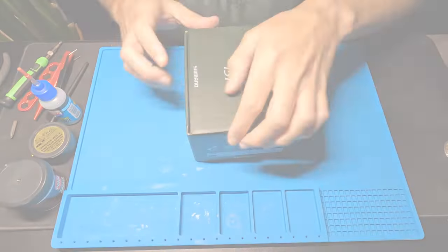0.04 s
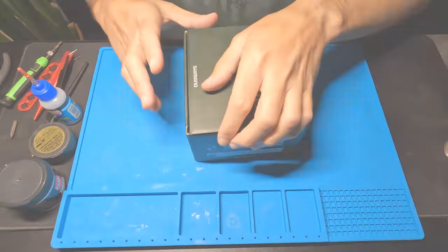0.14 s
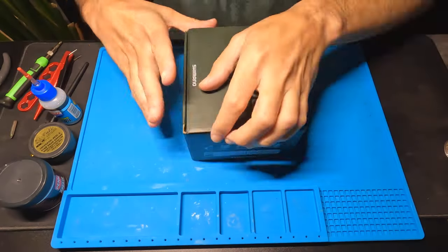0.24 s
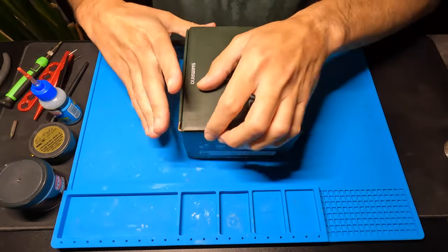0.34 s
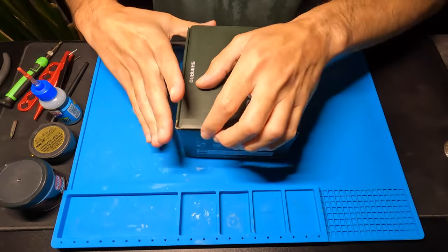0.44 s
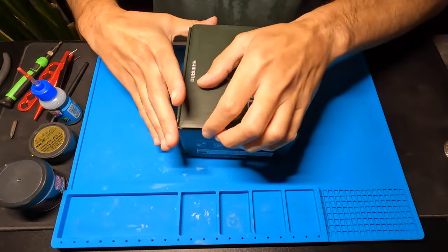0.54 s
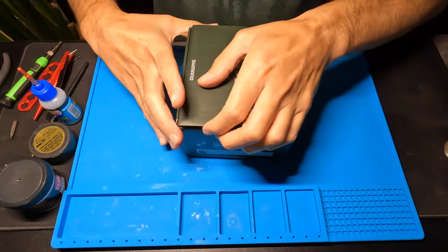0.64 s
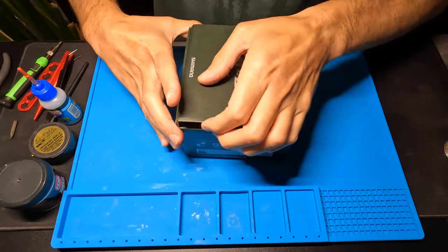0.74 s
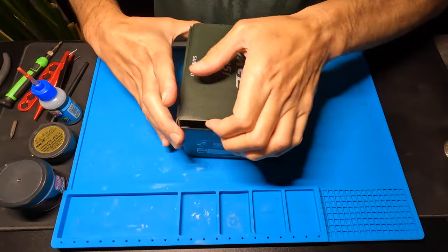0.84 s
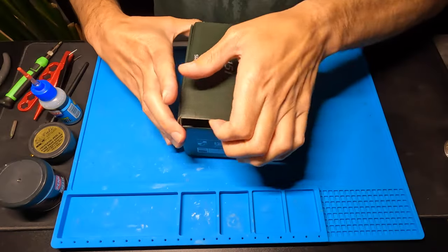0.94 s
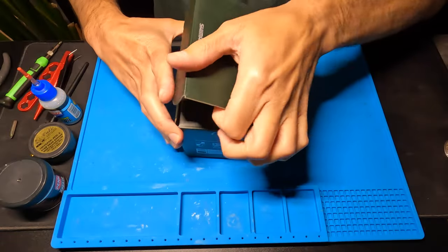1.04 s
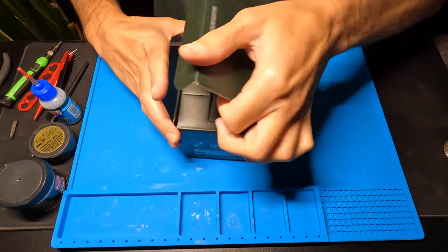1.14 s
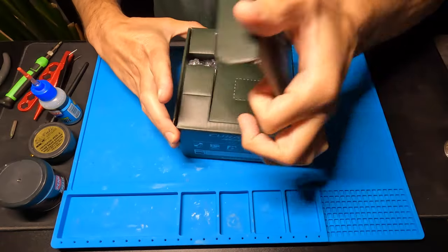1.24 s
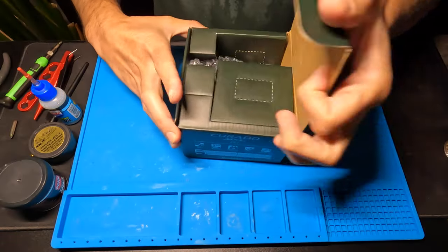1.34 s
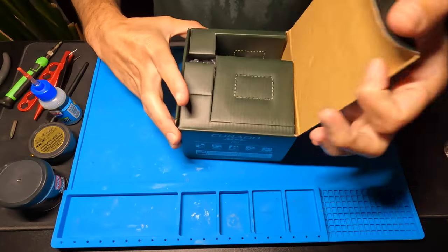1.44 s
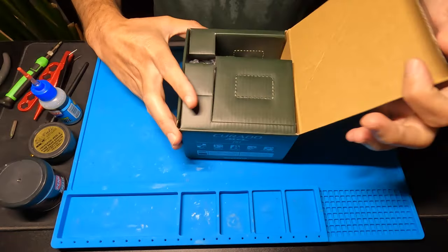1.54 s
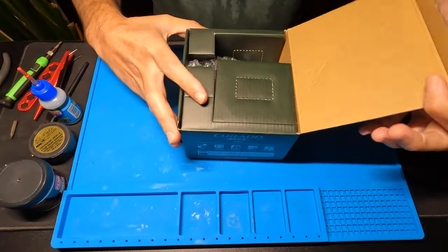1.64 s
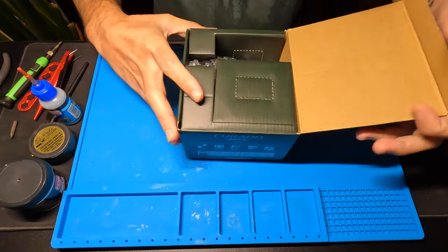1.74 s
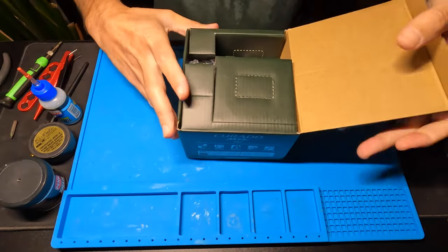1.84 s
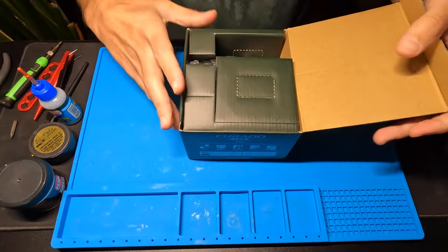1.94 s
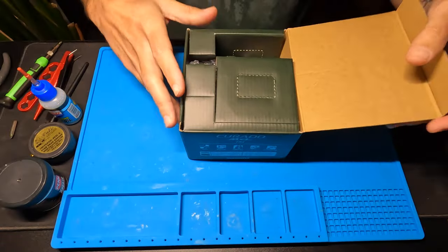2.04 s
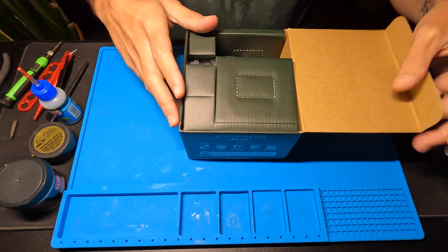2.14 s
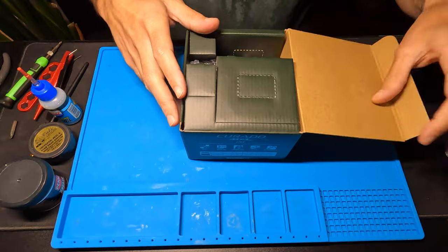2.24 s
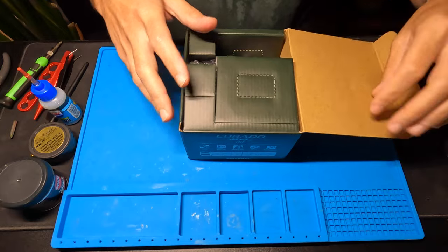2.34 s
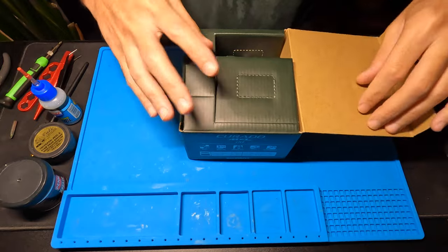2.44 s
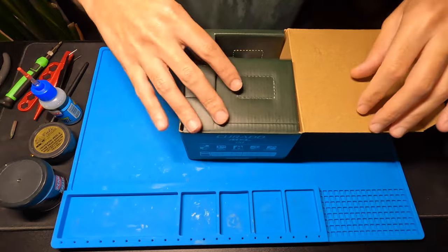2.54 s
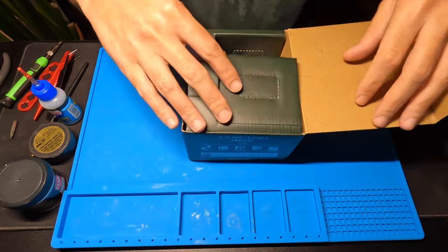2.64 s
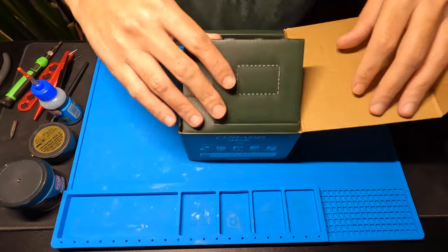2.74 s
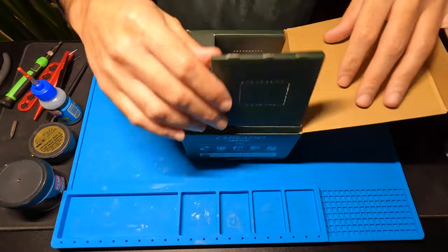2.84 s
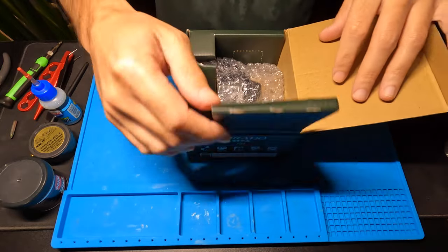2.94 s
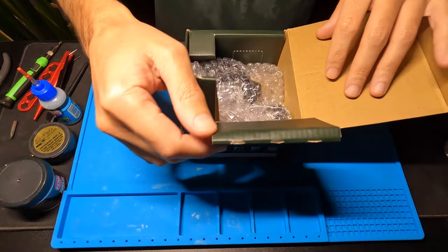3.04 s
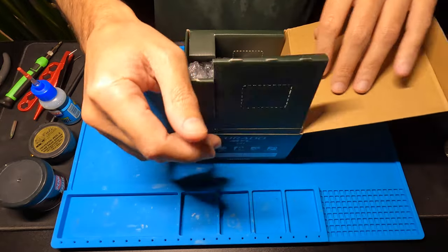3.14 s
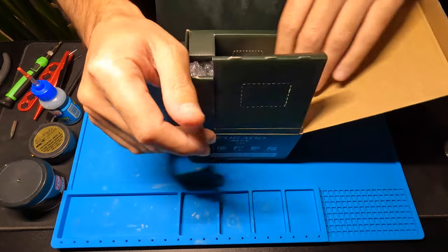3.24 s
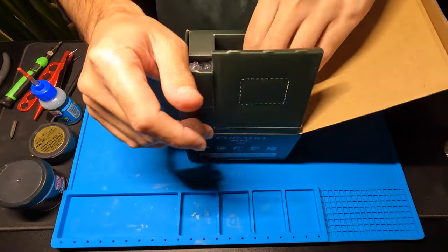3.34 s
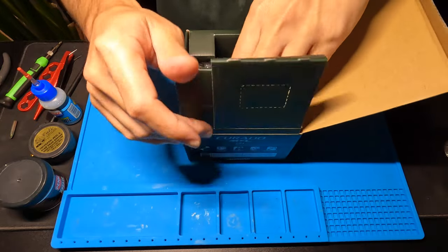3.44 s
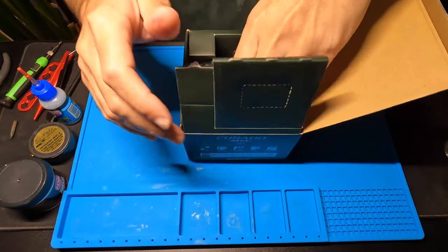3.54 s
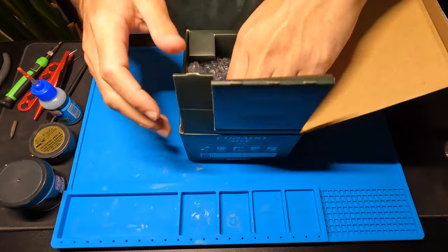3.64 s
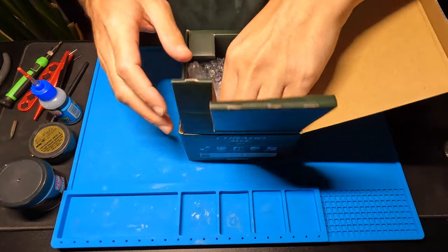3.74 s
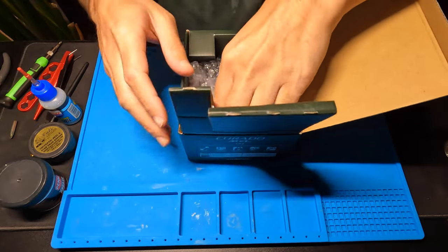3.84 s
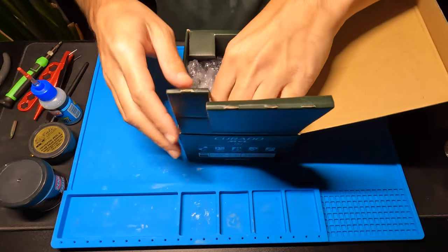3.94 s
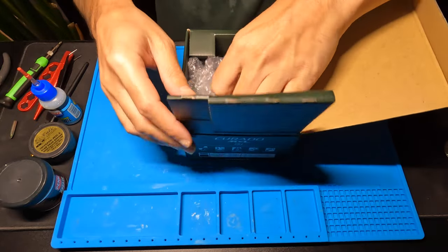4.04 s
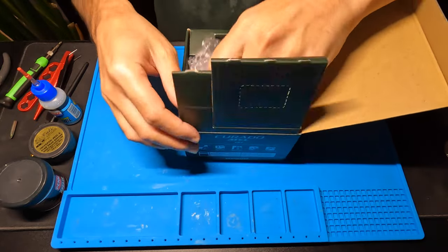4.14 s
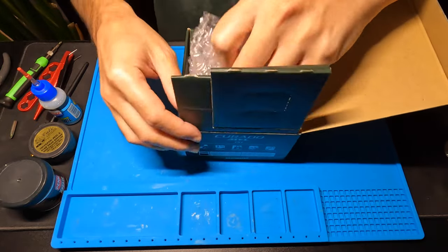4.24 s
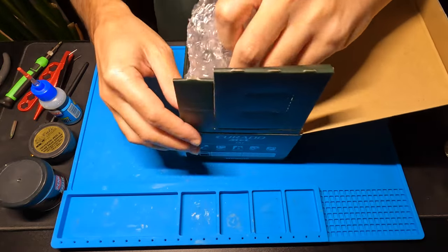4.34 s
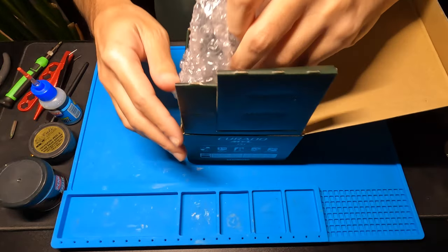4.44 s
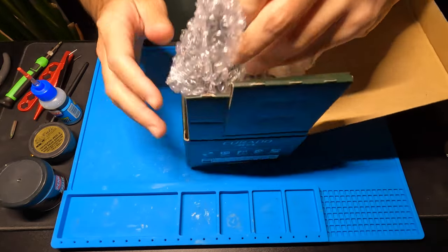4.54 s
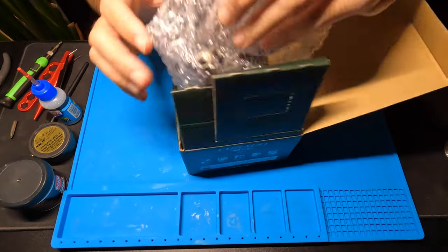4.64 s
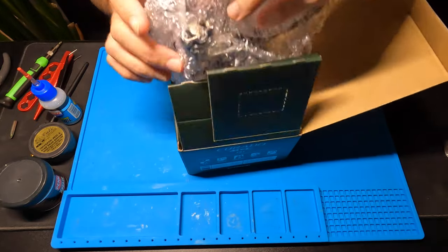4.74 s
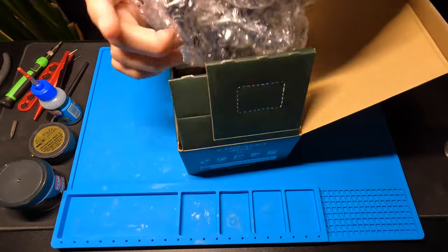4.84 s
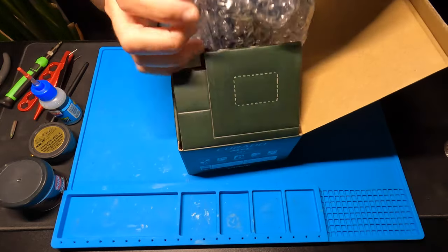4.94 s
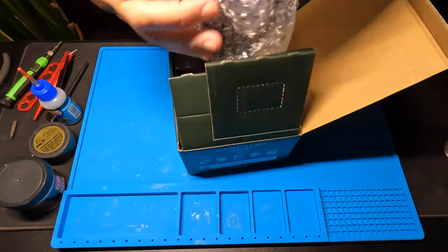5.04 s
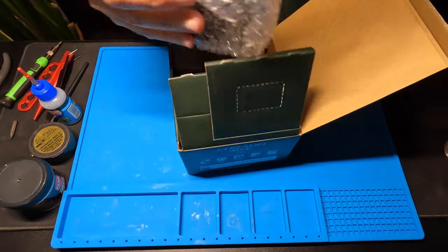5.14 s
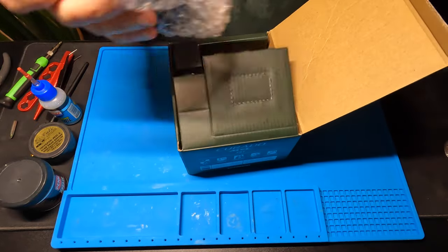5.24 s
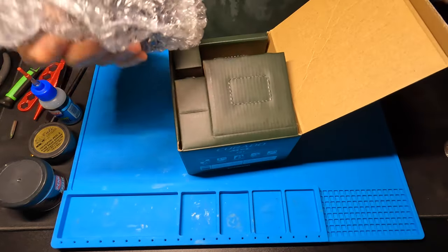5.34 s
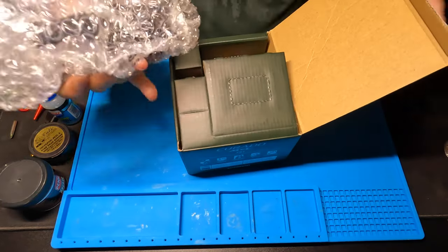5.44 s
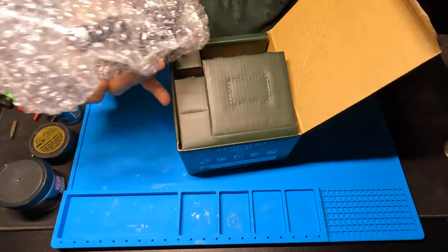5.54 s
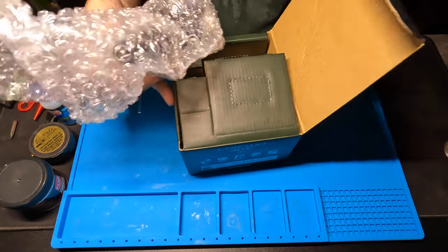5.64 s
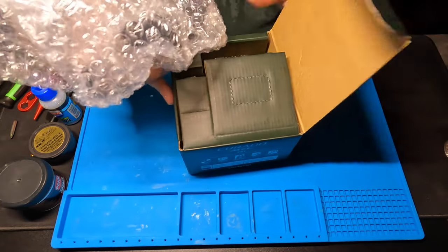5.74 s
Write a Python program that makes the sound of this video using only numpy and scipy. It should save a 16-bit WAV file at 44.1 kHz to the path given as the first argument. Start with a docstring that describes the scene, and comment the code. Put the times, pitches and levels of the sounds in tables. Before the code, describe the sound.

Close cardboard scrapes, a sharp flap snap, finger squeaks and hollow knocks lead into bright bubble wrap crinkling in a live, hard-walled room.

```python
"""Opening a small cardboard box

Hands open the box on a table: the tuck flap scrapes and snaps free, fingers slide and squeak over the lid,
an inner flap pops up, a hand rubs along the hollow box and pulls out a bundle of bubble wrap.
Scrapes and crinkles are shaped noise and tiny random ticks; snaps and knocks are short bursts that ring.
A hard-walled room answers every handling sound, over a low rumble and a slightly unsteady hum."""
import sys
import numpy as np
from scipy import signal
from scipy.fft import rfft, irfft, next_fast_len
from scipy.io import wavfile
from scipy.ndimage import map_coordinates

SR = 44100
rng = np.random.default_rng(int(sys.argv[2]) if len(sys.argv) > 2 else 0)


def unload_audio(sound):
    """Save the sound as a 16-bit wav file, at the path given as the first command line argument."""
    columns = np.transpose(np.atleast_2d(sound))
    # keep every value between -1 and 1, then stretch to whole-number steps
    steps = np.round(np.clip(columns, -1, 1) * 32767)
    wavfile.write(sys.argv[1], SR, steps.astype(np.int16))


N = 255133  # length in samples

# Sharp snaps: card edges letting go, and pops of the bubble wrap:
# [t/s, level/dB, slip length/s, ring f/Hz]
SNAPS = [(0.7225, -36, 0.005, 1880), (0.9403, -25.5, 0.0012, 2700), (0.9462, -31, 0.0019, 2000),
         (0.977, -36.5, 0.0073, 1870), (1.0746, -13, 0.0019, 2150), (1.0893, -13.5, 0.0039, 3540),
         (1.099, -25.5, 0.0021, 1810), (1.108, -26, .001, 1860), (1.52, -42, 0.00046, 3620),
         (1.893, -44.5, 0.0072, 2560), (2.311, -43.5, 0.0021, 2030), (2.652, -35.5, 0.0024, 2200),
         (2.745, -30, 0.027, 1800), (2.769, -22, 0.00099, 2830), (2.7978, -14, 0.000088, 4360),
         (3.182, -39, 0.0035, 2520), (3.226, -35, 0.0034, 1700), (3.233, -24, 0.011, 2300),
         (3.253, -21, 0.00076, 2160), (3.494, -36.5, 0.0031, 2400), (3.5208, -19, 0.0012, 1670),
         (3.584, -25.5, 0.0014, 1290), (3.695, -28, 0.0012, 2160), (3.726, -32.5, 0.0024, 1240),
         (3.74, -28, 0.0017, 1100), (4.1092, -24, 0.00086, 1280), (4.183, -22, 0.0022, 1750),
         (4.195, -22.5, 0.00065, 2270), (4.21, -20.5, 0.00065, 1970), (5.156, -26.5, 0.0073, 1690),
         (5.169, -22, 0.00048, 2280), (5.2487, -23.5, 0.0015, 2740), (5.718, -38.5, .0015, 1410),
         (5.733, -32.5, 0.0055, 2100)]
# Tone of a cut card edge rasping: [f/Hz, relative level/dB]
EDGE_TONE = [(47, -44), (80, 4.5), (132, -4), (461, -4.5), (780, -13), (1610, -18), (2440, -8),
             (3030, -16.5), (4400, -14.5), (7950, -27), (10800, -26), (15000, -54)]
# Tone of crinkling plastic film: [f/Hz, relative level/dB]
FILM_TONE = [(350, -96), (650, -32), (1140, -1.5), (1880, -1.5), (2310, -2), (3380, -1), (7000, -1.5),
             (8400, -9), (10700, -6.5), (13700, -17.5), (15500, -43)]
# Dull tone of something dragging on the box: [f/Hz, relative level/dB]
DRAG_TONE = [(41, -37.5), (70, -9.5), (140, -5.5), (522, -16.5), (1200, -12), (1700, -81)]
RING_HZ = 2520  # reference pitch of a snap


def amp(db):
    """Turn decibels into a gain."""
    return 10 ** (np.asarray(db) / 20)


def unit(x):
    """Scale to an average strength (rms) of 1."""
    return x / np.sqrt(np.mean(x ** 2) + 1e-20)


def along(points, hz):
    """Read a curve of (Hz, value) points, joined by straight lines on a log frequency axis."""
    f, v = np.transpose(points)
    return np.interp(np.log(hz + 1), np.log(f), v)


def coloured(x, gain):
    """Filter x to the given gain over frequency, with no sound ahead of its cause (minimum phase)."""
    n = x.shape[-1]
    m = 2 * next_fast_len(n // 2 + 2048)
    log_gain = np.log(np.maximum(gain(np.fft.rfftfreq(m, 1 / SR)), 1e-6))
    cepstrum = irfft(log_gain)
    # folding the second half onto the first makes the filter act only forwards in time
    cepstrum[1:m // 2] *= 2
    cepstrum[m // 2 + 1:] = 0
    response = np.exp(rfft(cepstrum))
    return irfft(rfft(x, m) * response)[..., :n]


def voiced(x, spectrum):
    """Give x the tone of a (Hz, dB) curve, at rms 1."""
    return unit(coloured(x, lambda hz: amp(along(spectrum, hz))))


def resonance(hz, centre, width):
    """Gain of one resonance: 1 at its centre, falling away on both sides."""
    return hz * width / np.hypot(centre ** 2 - hz ** 2, hz * width)


def ringing(x, modes, stretch=1):
    """Pass x through steep (Hz, width Hz, dB) resonances, their pitch scaled by stretch, at rms 1."""
    def gain(f):
        # squaring makes each resonance steeper
        return sum(amp(db) * resonance(f, hz * stretch, width) ** 2 for hz, width, db in modes)
    return unit(coloured(x, gain))


def wobble(rate):
    """A smooth random curve through rate random points a second."""
    return map_coordinates(rng.standard_normal(8192), [np.arange(N) * rate / SR], mode="wrap")


def slips(rate, spread_db, clump_db):
    """Tiny stick-slip ticks of uneven, clumping size; their rate sets the grain, not the level."""
    hit = rng.random(N) < rate / SR
    size = amp(spread_db * np.clip(rng.standard_normal(N), -2, 2) + clump_db * wobble(140))
    return unit(hit * size * rng.choice([-1, 1], N) / np.sqrt(rate))


def efforts(rows, attack, release, swell=0):
    """A gain curve per dB column: each effort rises up to its start, holds or swells, then lets go."""
    t, power = np.arange(N) / SR, 1e-18
    for s, length, *levels in rows:
        past = t - s - length
        swelling = swell * np.clip(past, -length, 0)  # reaches the listed level at the end
        fading = -60 * (np.maximum(s - t, 0) / attack + np.maximum(past, 0) / release)
        power = power + amp(np.add.outer(levels, swelling + fading)) ** 2
    return np.sqrt(power)


def add(track, s, sound):
    """Mix a sound into the track at time s in seconds."""
    part = track[round(s * SR):][:len(sound)]
    part += sound[:len(part)]


def background(rumble_db=-51, side_db=-16):
    """Sine waves drift slightly in level and phase over the room's low rumble of shaped noise."""
    # Hum partials: [f/Hz, level/dB]
    hum_partials = [(59.2, -49), (118.4, -63.5), (172.3, -70)]
    # Tone of the rumble: [f/Hz, relative level/dB]
    rumble_tone = [(25, 0.5), (60, -7.5), (170, -11), (380, -18.5), (600, -38), (1500, -32.5),
                   (3500, -46.5), (8000, -45), (15000, -56)]
    t = np.arange(N) / SR
    hum = sum(amp(db + wobble(2.67)) * np.sqrt(2) * np.sin(2 * np.pi * hz * t + 0.71 * wobble(2.05))
              for hz, db in hum_partials)
    mid, side = voiced(rng.standard_normal((2, N)), rumble_tone)
    return hum + amp(rumble_db) * (mid + amp(side_db) * np.array([side, -side]))


def table_top(x, early_db=-11.0, t60=0.014, apart_share=0.72, size=4096):
    """Table and flaps answer at once, differently left and right and anew in each overlapping block."""
    out, t = np.zeros((2, N + 4 * size)), np.arange(size // 4) / SR
    padded, window = np.pad(x, (size, 2 * size)), signal.windows.cosine(2 * size)
    for start in range(0, N + size, size):
        shared, apart = rng.standard_normal((2, len(t))) * amp(-60 * t / t60) * (t > .001)
        # mostly short waves differ between the two close microphones
        apart = coloured(apart, lambda f: apart_share * f / np.hypot(f, 500))
        answer = unit(np.array([shared + apart, shared - apart])) / np.sqrt(len(t))
        block = padded[start:start + 2 * size] * window
        echo = signal.fftconvolve(block[None], answer, axes=1)
        out[:, start:start + echo.shape[1]] += echo
    return amp(early_db) * out[:, size:size + N]


def room(x, tail_db=-16.5, gap=0.0069, width=0.42):
    """Near surfaces answer first; the hard walls follow with a long tail of fading noise."""
    # Time the tail takes to fall by 60 dB: [f/Hz, t60/s]
    fade_times = [(150, 0.52), (400, 1), (4000, 0.9)]
    # Strength of the whole answer; small panels send little bass into the room: [f/Hz, level/dB]
    answer_tone = [(50, -21.5), (150, 2.5), (350, 8.5), (4000, 5.5), (12000, 4.5)]
    hz, t, z = signal.stft(rng.standard_normal((2, SR)), SR, nperseg=256)
    fading = z * amp(-60 * t / along(fade_times, hz)[:, None])
    mid, side = signal.istft(fading, SR, nperseg=256)[1][:, :SR]
    build_up = np.minimum(np.arange(SR) / SR / gap, 1) ** 2
    tail = np.array([mid + width * side, mid - width * side]) * build_up
    walls = signal.fftconvolve(x, amp(tail_db) * unit(tail) / np.sqrt(SR), axes=1)[:, :N]
    return coloured(table_top(x.mean(axis=0)) + walls, lambda f: amp(along(answer_tone, f)))


def snap_ring():
    """The room rings on, high and thin, after the flap's snap: noise through narrow resonances, fading."""
    # Resonances of the ring: [f/Hz, width/Hz, relative level/dB]
    ring_modes = [(2580, 59, -9), (3790, 190, 0.5), (4830, 140, -10)]
    start_s, level_db, t60_s = 1.092, -44.5, 0.76  # it starts as the flap snaps free
    out, t = np.zeros(N), np.arange(SR // 2) / SR
    add(out, start_s, amp(level_db - 60 * t / t60_s) * ringing(rng.standard_normal(len(t)), ring_modes))
    return out


def strokes(sharpness=1.0, taper=0.84):
    """Fingers and flaps brush over the lid: a fine, dense grain that swells and fades in each stroke."""
    # Brushing strokes, each with its own brightness: [t/s, level/dB, length/s, centre f/Hz]
    stroke_rows = [(0.016, -53.5, 0.075, 4630), (0.025, -64, 0.38, 5300), (0.252, -57.5, 0.085, 1900),
                   (0.36, -59.5, 0.12, 2060), (0.622, -56.5, 0.04, 740), (0.687, -53, .02, 1900),
                   (1.134, -44.5, 0.1, 3800), (1.247, -43.5, 0.053, 2200), (1.468, -50.5, 0.072, 1420),
                   (1.642, -56.5, 0.15, 4520), (1.844, -44.5, 0.093, 3050), (2.108, -57.5, 0.18, 3670),
                   (2.345, -57.5, 0.1, 2170), (2.463, -43, 0.019, 2190), (2.471, -47.5, 0.16, 3270),
                   (2.52, -45, 0.017, 2670), (2.547, -45.5, 0.027, 2900), (2.612, -41, 0.067, 3320),
                   (2.885, -55, 0.13, 6500), (3.042, -51, 0.11, 3560), (3.136, -53.5, 0.1, 4300),
                   (3.346, -47.5, 0.033, 2600)]
    # Tone of skin on card: [f/Hz, relative level/dB]
    skin_tone = [(400, 10), (850, -5.5), (1100, 9), (1450, 3.5), (2300, -3.5), (3200, -5), (4500, -5.5),
                 (8000, -11.5), (11000, -10.5), (15000, -33.5)]
    out, grain = np.zeros(N), slips(rate=1700, spread_db=1.5, clump_db=0.5)
    for s, db, length, hz in stroke_rows:
        u = np.linspace(0, 1, round(length * SR), endpoint=False)
        piece = grain[round(s * SR):][:len(u)]
        rub = coloured(piece, lambda f: amp(along(skin_tone, f)) * resonance(f, hz, hz / sharpness))
        add(out, s, amp(db) * np.sin(np.pi * u) ** taper * unit(rub))
    return out


def squeaks(flutter=0.067, count=3):
    """A fingertip sticks and slips fast enough to give a rough, sagging note with overtones."""
    # Squeaks on the coated card: [t/s, length/s, level/dB, starting f/Hz]
    squeak_rows = [(2.451, 0.028, -48, 1320), (2.552, 0.028, -41.5, 1126), (2.595, .014, -43, 1150),
                   (2.615, .056, -43, 1190)]
    sag_hz_per_s = 3100  # the pitch falls as the finger slows
    overtone_db = -3  # step from one overtone to the next
    out = np.zeros(N)
    for s, length, db, start_hz in squeak_rows:
        t = np.arange(round(length * SR)) / SR
        hz = (start_hz - sag_hz_per_s * t) * (1 + flutter * wobble(408)[:len(t)])
        phase = 2 * np.pi * np.cumsum(hz) / SR
        note = sum(amp(k * overtone_db) * np.sin((k + 1) * phase) for k in range(count))
        add(out, s, amp(db) * np.sin(np.pi * t / length) * note)
    return out


def rummage(edge_db=-2, hollow_db=-3):
    """A hand judders along a wall: the card rasps and the same slips drum on the hollow box."""
    # Rubs, levels before the shared trims; each grip retunes the box:
    # [t/s, length/s, edge level/dB, hollow level/dB, pitch ratio]
    rub_rows = [(3.523, 0.0078, -33, -34.5, 1.07), (3.57, 0.027, -36.5, -29, 0.96),
                (3.605, 0.02, -39, -51, 0.82), (3.732, 0.011, -44, -33.5, 1.03),
                (3.763, 0.022, -31.5, -31.5, .93), (3.813, 0.038, -42.5, -42, 1.26)]
    # Box resonances: [f/Hz, width/Hz, relative level/dB]
    box_modes = [(363, 127, 19), (535, 120, -5), (830, 120, 0), (1210, 210, 9), (1530, 240, 11.5)]
    attack_s, release_s = 0.052, 0.19  # 60 dB rise and fall
    out = np.zeros(N)
    for *rub, stretch in rub_rows:
        edge, hollow = efforts([rub], attack_s, release_s)
        drive = slips(rate=1100, spread_db=3.0, clump_db=0.8)
        out += amp(edge_db) * edge * voiced(drive, EDGE_TONE)
        out += amp(hollow_db) * hollow * ringing(drive, box_modes, stretch)
    return out


def flap(level_db=-1, rasp_db=-3):
    """The tuck flap's cut edge rasps along its slot, rings the card around it and drags on the box."""
    # Tugs on the flap, scrape levels before the shared trim:
    # [t/s, length/s, scrape level/dB, drag level/dB, slot pitch ratio]
    tug_rows = [(0.702, 0.018, -53.5, -65, 1), (0.724, 0.027, -34.5, -60, 0.98),
                (0.776, 0.056, -37.5, -42, 1.026), (0.924, 0.071, -53.5, -46.5, 1.02)]
    # The flap's resonances in its slot: [f/Hz, width/Hz, relative level/dB]
    slot_modes = [(526, 150, 5), (1096, 400, 1), (2300, 310, -4), (4400, 600, -11), (6380, 1200, -14.5)]
    attack_s, release_s = 0.066, 0.067  # 60 dB rise and fall
    out = np.zeros(N)
    for *row, stretch in tug_rows:
        tug, drag = efforts([row], attack_s, release_s)
        drive = slips(rate=1300, spread_db=3.5, clump_db=1.0)
        scrape = ringing(drive, slot_modes, stretch) + amp(rasp_db) * voiced(drive, EDGE_TONE)
        out += amp(level_db) * tug * scrape + drag * voiced(drive, DRAG_TONE)
    return out


def pop(hz, q=3.6):
    """One buckle of the film: a tick of fading noise that rings briefly around hz, with peak 1."""
    t = np.arange(SR // 50) / SR
    burst = amp(-60 * t / 0.009) * rng.standard_normal(len(t))  # falls 60 dB in 9 ms before it rings
    tick = coloured(burst, lambda f: amp(along(FILM_TONE, f)) * resonance(f, hz, hz / q))
    return tick / np.abs(tick).max()


def creases():
    """Now and then a fold of the film flips over with a sharp tick."""
    # Sharp creases of the plastic film: [t/s, peak level/dB, ring f/Hz]
    crease_rows = [(4.344, -29, 2000), (4.555, -30, 5400), (4.592, -24, 4900), (4.9252, -27, 4500),
                   (4.9525, -25, 5600), (5.223, -27, 4000), (5.63, -31.5, 4200)]
    out = np.zeros(N)
    for s, db, hz in crease_rows:
        add(out, s, amp(db) * pop(hz))
    return out


def pops(held_s, octaves=0.75):
    """From held_s on, single film cells buckle at random moments, each ringing at its own pitch."""
    pops_per_s, middle_hz = 160, 3030
    level_db, spread_db = 3.5, 1.5  # peak against the rustle's rms
    out = np.zeros(N)
    for s in np.cumsum(rng.exponential(1 / pops_per_s, 800)) + held_s:
        if s < N / SR:
            hz = np.clip(middle_hz * 2 ** rng.normal(0, octaves), 1700, 11000)
            add(out, s, amp(level_db + spread_db * np.clip(rng.normal(), -2, 2)) * pop(hz))
    return out


def crackle(rate, life=0.001):
    """Each buckle sets off a tiny noise burst whose power fades with time constant life in seconds."""
    hits = slips(rate, spread_db=-0.5, clump_db=0.0) ** 2
    power = signal.lfilter([1], [1, -np.exp(-1 / (life * SR))], hits)
    return np.sqrt(power) * rng.standard_normal(N)


def wrap(crinkle_db=0.66, drag_db=-2, busy_db=-35, busy_rate=260, calm_rate=90, patchy_db=2, count=11):
    """Film cells of many sizes buckle, each size at its own pitch, while the bundle drags on the box."""
    # Pulls on the bubble wrap, levels before the shared trims:
    # [t/s, length/s, crinkle level/dB, drag level/dB, favoured cell f/Hz before wander]
    pull_rows = [(3.774, 0.232, -40.5, -48.5, 3080), (4.107, 0.099, -35.5, -36, 1680),
                 (4.256, 0.16, -33.5, -38, 2080), (4.543, 0.065, -37, -42, 4700),
                 (4.694, 0.12, -37.5, -43, 1890), (4.928, 0.041, -34.5, -42.5, 4300),
                 (5.045, 0.13, -31.5, -38, 1930), (5.218, 0.017, -33, -42, 4650),
                 (5.392, 0.091, -46.5, -63, 5060)]
    attack_s, release_s = 0.41, 0.15  # 60 dB rise and fall
    tension_db_per_s = 13.5  # tension builds while a pull lasts
    # a soft rustle from the first touch, which later settles
    held_s, held_db, droop_s, droop_db_per_s = 3.69, -48.5, 5.58, 24
    dulling, neutral_db = 0.1, -65.5  # dB per octave of treble lost for each dB above neutral
    favour_db, favour_octaves, wander_octaves = 5, 0.16, 0.67  # favoured size wanders as the grip shifts
    t, pulls = np.arange(N) / SR, np.array(pull_rows)
    pull, drag = efforts(pulls[:, :4], attack_s, release_s, tension_db_per_s)
    held = (t > held_s) * amp(held_db - droop_db_per_s * np.maximum(t - droop_s, 0))
    crinkle = np.hypot(pull, held)
    bright = np.clip((crinkle / amp(neutral_db)) ** -dulling, .5, 2)  # a hard pull buckles the larger cells
    rate = calm_rate + busy_rate * (crinkle / amp(busy_db)) ** 2  # and merges the ticks into a rustle
    middles = pulls[:, 0] + pulls[:, 1] / 2
    favoured = np.interp(t, middles, np.log2(pulls[:, 4])) + wander_octaves * wobble(16)
    cells = np.zeros((2, N))
    for hz in np.geomspace(1100, 12000, count):
        ticks = unit(coloured(crackle(rate), lambda f: resonance(f, hz, 0.57 * hz)))
        side = np.array([[1], [-1]]) * 0.37 * wobble(90)  # cells lie to the left and right
        lift = favour_db * np.exp(-((np.log2(hz) - favoured) / favour_octaves) ** 2)
        patches = patchy_db * (wobble(16) + wobble(110))
        cells += ticks * np.sqrt(hz) * amp(side + lift + patches) * bright ** np.log2(hz / 3500)
    rub = voiced(slips(rate=1100, spread_db=4.0, clump_db=1.0), DRAG_TONE)
    rustle = voiced(cells, FILM_TONE) + pops(held_s)
    return amp(crinkle_db) * crinkle * rustle + amp(drag_db) * drag * rub


def blows(rows, t60, attack, partials):
    """Each blow sets a few fading sine waves (pitch ratio, dB) swinging, slightly varied every time."""
    out, t = np.zeros(N), np.arange(SR // 2) / SR
    for s, db, hz in rows:
        ring = sum(amp(level + rng.normal(0, 1.5)) * np.sin(2 * np.pi * hz * ratio * rng.normal(1, 0.062) * t)
                   for ratio, level in partials)
        add(out, s, amp(db - 60 * t / t60) * (1 - np.exp(-t / attack)) * ring)
    return out


def box():
    """Snaps and knocks ring the box panels briefly; heavier shoves rock the table under it."""
    # Hands and flaps bumping the hollow box: [t/s, level/dB, panel f/Hz]
    knock_rows = [(1.078, -28, 183), (1.098, -18, 169), (1.110, -18.5, 268), (1.116, -22, 185),
                  (1.127, -23, 245), (1.283, -29.5, 375), (2.655, -35, 344), (2.768, -26.5, 311),
                  (2.779, -27, 201), (3.235, -22.5, 323), (3.256, -21, 380), (3.259, -24, 118),
                  (3.522, -24, 294), (3.582, -26, 345), (3.611, -24, 325), (3.626, -25.5, 335),
                  (3.665, -35, 342), (3.74, -28, 390), (4.217, -29.5, 127), (4.952, -28.5, 267),
                  (5.16, -26, 240), (5.251, -30.5, 214), (5.717, -29, 235), (5.739, -31, 350)]
    # Soft shoves that shake the table: [t/s, level/dB, f/Hz]
    thump_rows = [(1.142, -28.5, 52.4), (2.48, -41, 52), (2.852, -30.5, 53.3), (4.22, -33, 55.6),
                  (4.78, -28.5, 71.5), (5.03, -35, 71.4), (5.2, -32, 78.3)]
    # every snap also knocks a panel, dull ones most
    kick_db, kick_db_per_octave, kick_delay_s, panel_hz = -12.5, -5, 0.0018, 303
    kicks = [(s + kick_delay_s, db + kick_db + kick_db_per_octave * np.log2(hz / RING_HZ), panel_hz)
             for s, db, _, hz in SNAPS]
    knocks = blows(knock_rows + kicks, t60=0.053, attack=0.00077,
                   partials=[(.6, -6.5), (1, 0), (1.25, -5), (2.1, -10.5)])
    return knocks + blows(thump_rows, t60=0.57, attack=0.002, partials=[(.55, 0.3), (1, 2.3)])


def snaps(die=0.012, build=0.54, release=25, panel_db=-18, panel_t60=0.16):
    """Noise chatters for the length of each slip, then dies quickly over a fainter, slower ring-out."""
    # Tone shared by all snaps: [f/Hz, relative level/dB]
    snap_tone = [(150, -22), (400, 18), (700, 6.5), (1150, 10), (1700, 4.5), (3000, 1.5), (3800, 5.5),
                 (5200, 6), (7000, 2.5), (9000, -3.5), (11500, -2), (15000, -18.5)]
    ring_q, purer = 0.95, 1.9  # sharpness up to RING_HZ; above it, higher snaps ring purer (exponent)
    out, t = np.zeros(N), np.arange(SR // 8) / SR
    for s, db, length, hz in SNAPS:
        q = ring_q * (hz / RING_HZ) ** purer if hz > RING_HZ else ring_q
        after = np.maximum(t - length, 0)
        decay = amp(-60 * after / die) + amp(panel_db - 60 * after / panel_t60)
        shape = decay * (1 - np.exp(-t / (build * length)))
        drive = shape * rng.standard_normal(len(t))
        drive[0] += release * np.exp(-length / 0.00068)  # the shortest slips are one clean crack
        burst = coloured(drive, lambda f: amp(along(snap_tone, f)) * resonance(f, hz, hz / q))
        add(out, s, amp(db) * burst * np.linalg.norm(shape) / np.linalg.norm(burst))
    return out


def scene():
    """The handling sounds, close and near the centre, with the room's answer and the background."""
    near = snaps() + box() + flap() + snap_ring() + strokes() + squeaks() + rummage() + wrap() + creases()
    return near + room(near) + background()


def record(dry, lag=.000012):
    """Sound reaches the left microphone lag seconds later; nothing above the top frequency is kept."""
    # The microphones differ a little: [f/Hz, left minus right level/dB]
    port_tone = [(50, -2), (250, 0.5), (5000, -0.5), (12000, 1.5)]
    top_hz = 15700
    m = next_fast_len(N + SR // 4)
    hz, side = np.fft.rfftfreq(m, 1 / SR), np.array([[.5], [-.5]])
    ports = amp(side * along(port_tone, hz)) * np.exp(-2j * np.pi * hz * lag * side)
    return irfft(rfft(dry, m) * ports * (hz < top_hz), m)[:, :N]


dry = scene()
out = record(dry)
unload_audio(out)
```